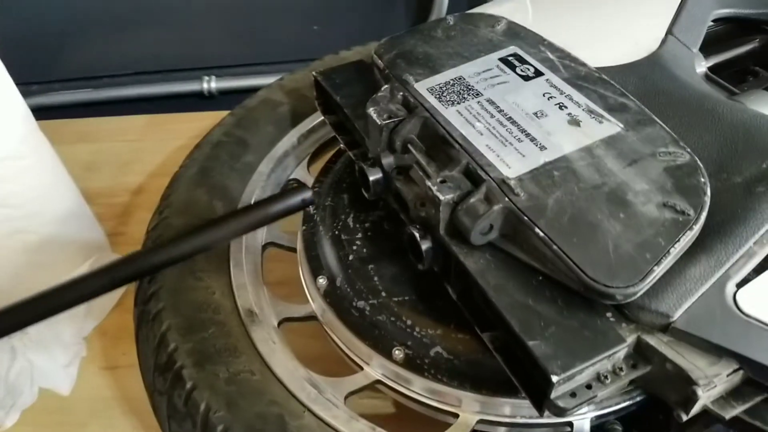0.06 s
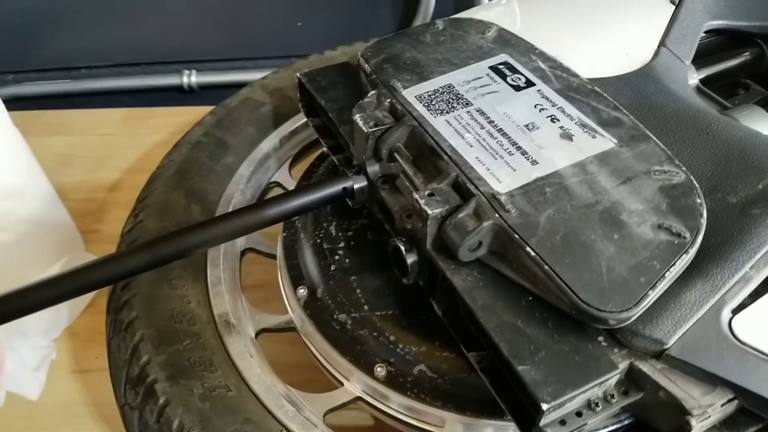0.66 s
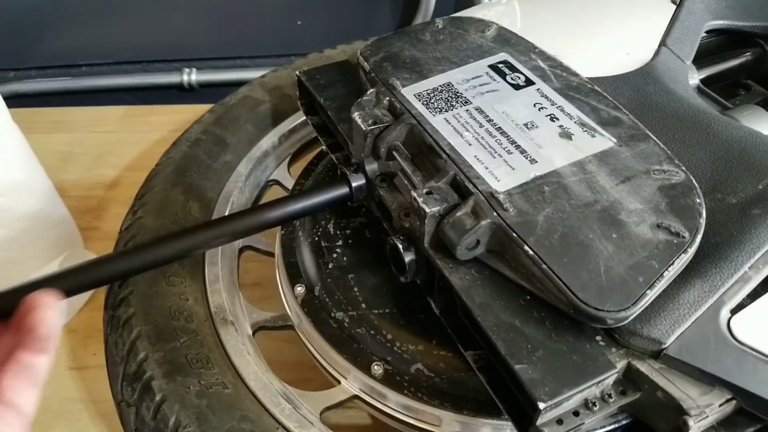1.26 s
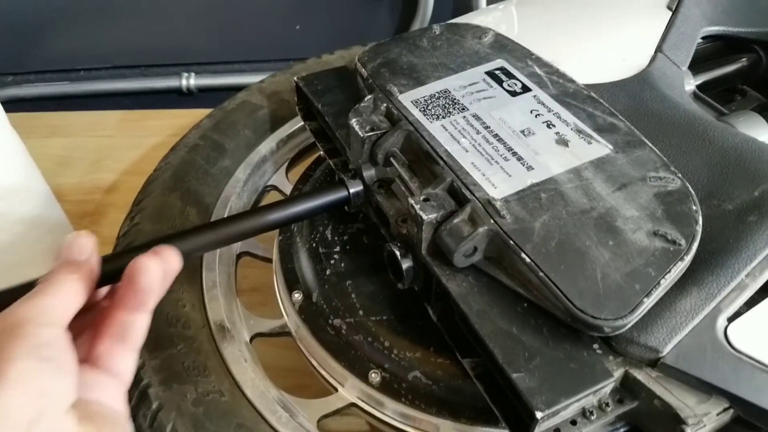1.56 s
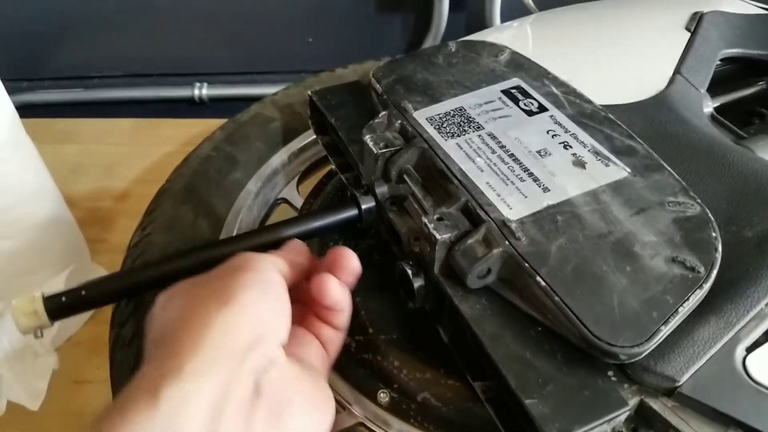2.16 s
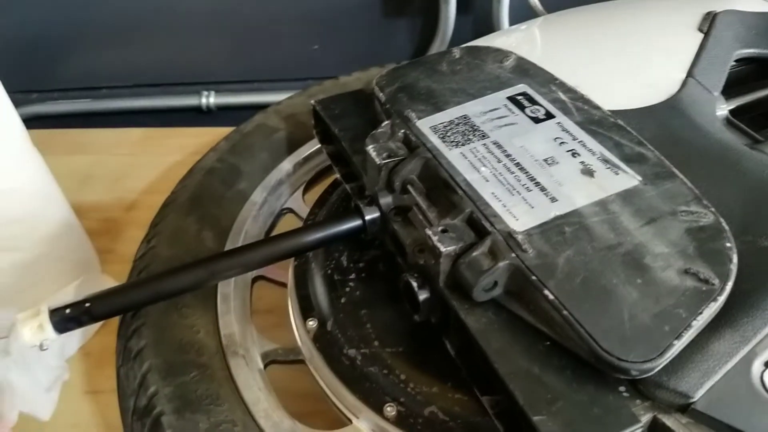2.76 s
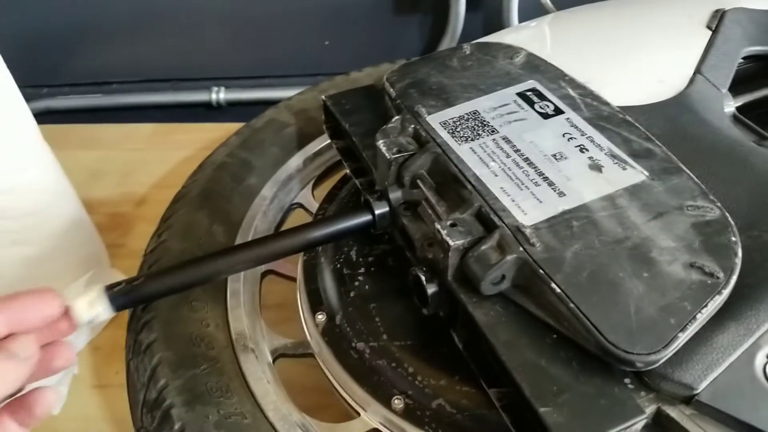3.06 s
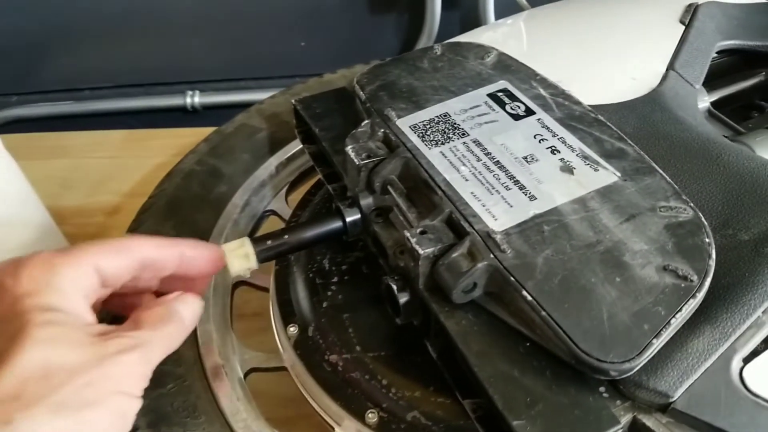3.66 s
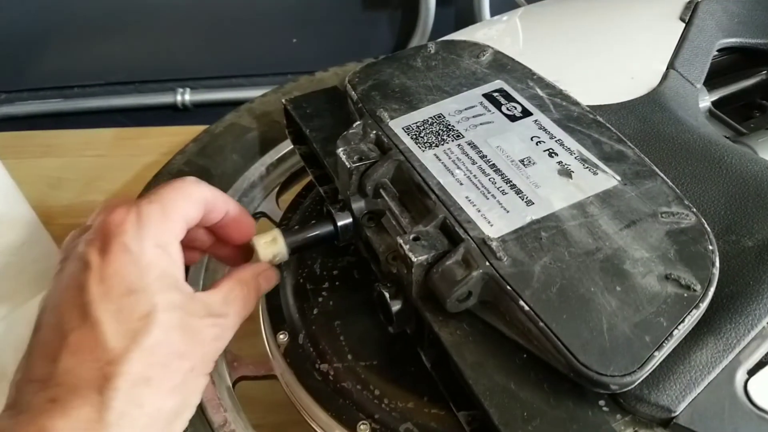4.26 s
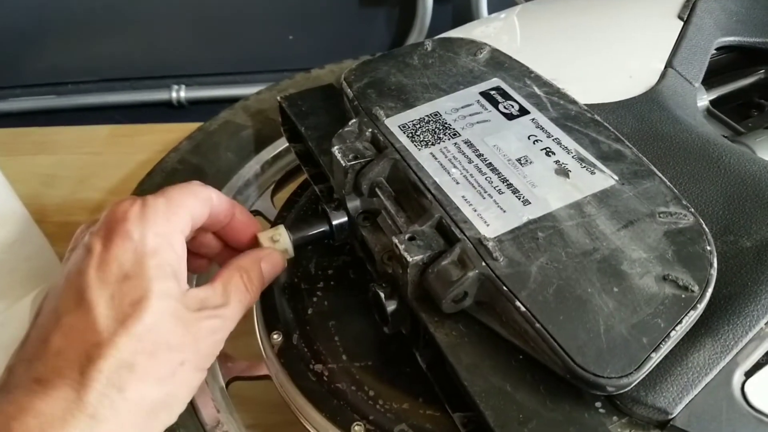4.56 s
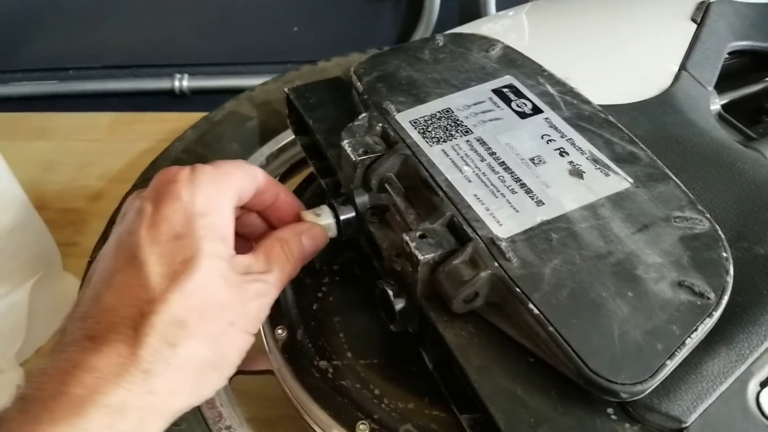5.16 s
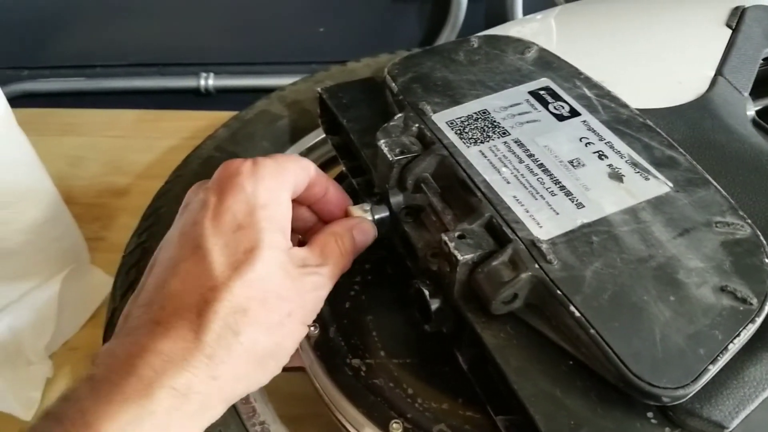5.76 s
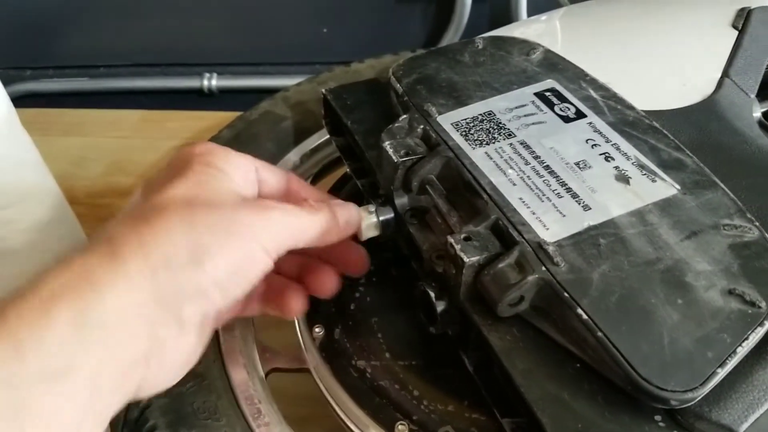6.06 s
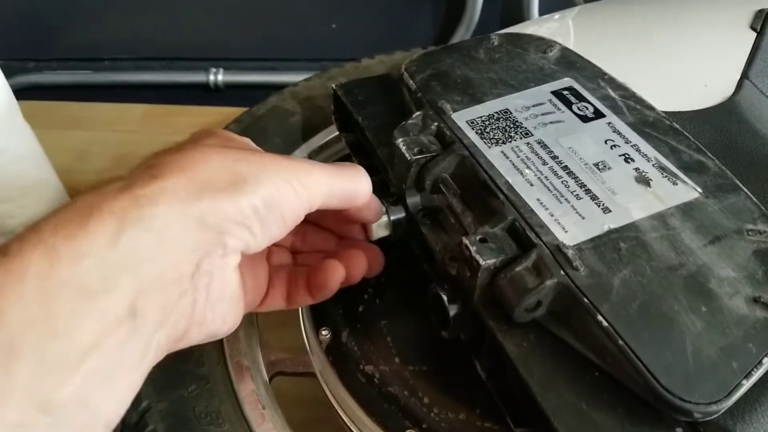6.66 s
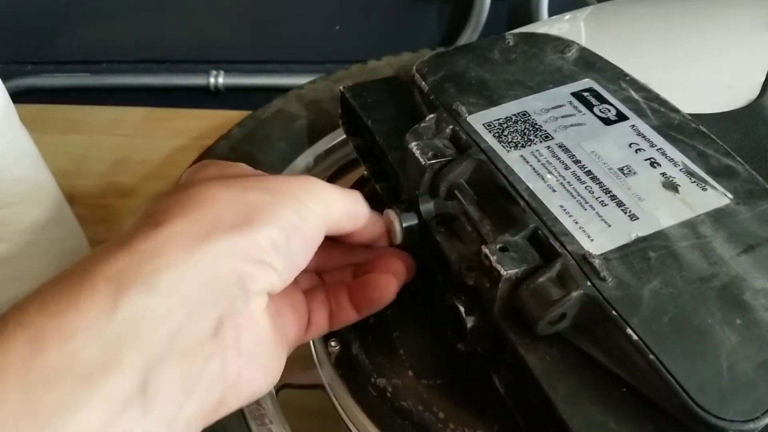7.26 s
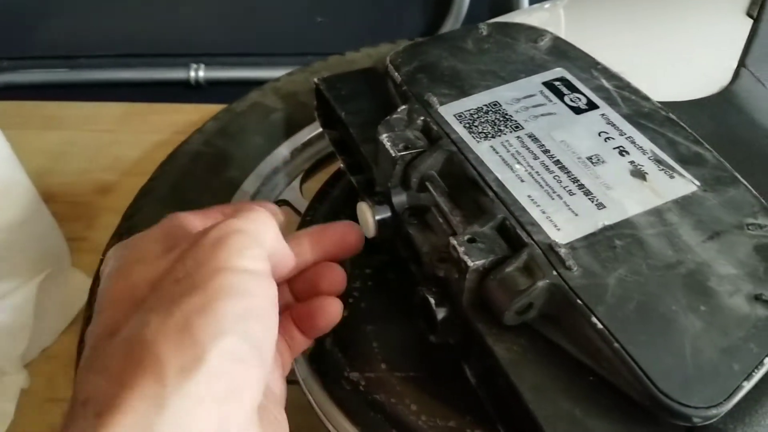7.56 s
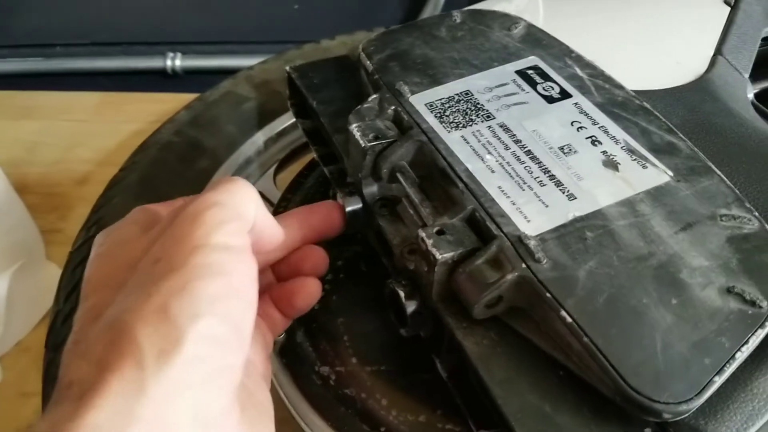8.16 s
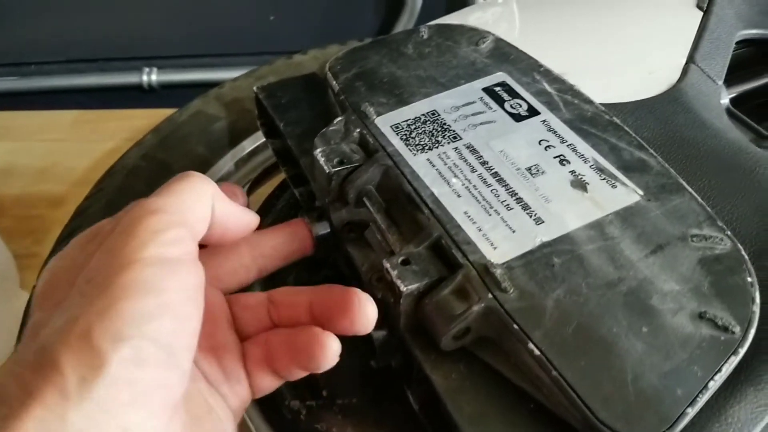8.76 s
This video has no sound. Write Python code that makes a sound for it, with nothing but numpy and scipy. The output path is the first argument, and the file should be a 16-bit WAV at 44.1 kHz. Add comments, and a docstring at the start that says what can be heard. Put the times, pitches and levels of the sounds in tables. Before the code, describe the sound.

A metal rod knocks against a wheel's metal and plastic frame, each contact ringing briefly. It is pushed in by hand with short, gritty scrapes and a rough, squeaky chatter. After a pair of sharp clacks the scraping thins out into light clicks, faint finger rubbing, a small tinkle and soft thuds on the workbench. It is all heard close up in a small, quiet room.

```python
"""A knock of metal, close by: a greased rod meets the mouth of the bore in the frame of a wheel.
Pushed by hand, it scrapes and chatters inwards in short shoves and is pressed home by the fingertips.
Every contact rings the same metal and plastic housing; the workbench thuds softly under the wheel.
A small quiet room, heard from beside the bench through a pair of small microphones."""
import sys
import numpy as np
from scipy import signal
from scipy.fft import rfft, irfft
from scipy.io import wavfile

SR = 44100
rng = np.random.default_rng(int(sys.argv[2]) if len(sys.argv) > 2 else 0)


def int16_out(signal):
    """Quantize to a 16-bit WAV file."""
    q = np.round(np.clip(np.atleast_2d(signal).T, -1, 1) * 32767)
    wavfile.write(sys.argv[1], SR, q.astype(np.int16))


N = 397341
TIME = np.arange(N) / SR
RING_TIME = np.arange(int(SR * 0.36)) / SR

# Levels are relative within each table.
# rod knocking on the frame: (time [s], level [dB], hardness as crack against clack [dB], rattle time [s])
ROD_KNOCKS = [(0.408, -37.5, -7.5, 0.0013), (0.88, -66, 16.5, 0.0077), (0.924, -28.5, 11, 0.00053),
              (0.951, -29, 0, 0.0032), (1.183, -30.5, 10.5, 0.0021), (1.412, -34, 1, 0.0073),
              (1.818, -32.5, 2.5, .0096), (1.966, -36, 16.5, .009), (2.254, -32, -10.5, 0.0052),
              (2.270, -33, -7.5, 0.01), (3.043, -44, 17.5, 0.003), (3.139, -28, 3, 0.001),
              (4.285, -20.5, -13.5, 0.0031), (4.434, -26, -4, 0.0051), (4.624, -45, -14, 0.0016),
              (4.732, -54, 8.5, 0.0021), (4.796, -48, -7.5, 0.0031), (5.483, -58, 0.5, 0.00058),
              (5.603, -47.5, -26, 0.0031), (5.725, -39.5, -7, 0.0063), (6.124, -47.5, -17.5, 0.0045),
              (7.143, -42.5, 4, .0031), (7.297, -45, -9, 0.0019), (7.945, -57.5, -1, 0.0051),
              (8.312, -63, 11.5, .0023), (8.51, -63, -5, 0.0022)]
# shoves along the bore: (start [s], length [s], level [dB], grit as hiss against scrape [dB])
ROD_SHOVES = [(1.195, 0.13, -38.5, -0.5), (1.335, 0.16, -55, 17), (1.42, 0.046, -46, 13.5),
              (1.47, 0.23, -45, 2), (1.655, 0.035, -36, 5.5), (1.72, 0.074, -38, 4.5),
              (1.795, 0.1, -30, -2), (1.92, 0.054, -45.5, 7), (1.972, 0.058, -26.5, -7),
              (2.04, 0.051, -40.5, -5.5), (2.11, 0.061, -46.5, -7.5), (2.3, 0.11, -61, -8),
              (2.41, 0.038, -49.5, -12), (2.49, 0.066, -65, -4), (2.93, .17, -32.5, -6.5),
              (3.13, 0.089, -30.5, -4.5), (3.25, 0.06, -35, 0), (3.345, 0.12, -38.5, -6.5),
              (3.49, 0.049, -39.5, -4), (3.562, 0.076, -40.5, -6), (3.795, 0.056, -50.5, -3),
              (3.88, 0.068, -44.5, -9.5), (3.995, .04, -55, -7.5), (4.118, 0.19, -46.5, -7),
              (4.398, 0.052, -38, -11), (4.52, 0.21, -55.5, -1.5), (4.785, 0.096, -53.5, -4),
              (5.005, 0.037, -64, -11), (5.175, 0.038, -56, -12.5), (5.588, .11, -62.5, -19),
              (6.785, 0.028, -67, -11), (7.135, 0.057, -61.5, -21), (7.945, 0.057, -61, -8)]
# stick-slip in the bore: (start [s], length [s], first pitch [Hz], last pitch [Hz], level [dB])
CHATTER_GLIDES = [(1.464, 0.014, 1750, 1680, -25.5), (1.502, .165, 1792, 1552, -37),
                  (1.669, 0.22, 2072, 2140, -36), (2.933, .17, 1487, 949, -38.5),
                  (4.112, 0.1, 1760, 1220, -48.5), (4.272, 0.014, 1776, 1714, -21)]
# contacts tend to boom more as the rod goes home: (time [s], boom against clack [dB])
SEATING_BOOM = [(0.4, -7), (1.32, -8.5), (1.5, -23), (1.8, -23), (2.02, -12), (3.1, -13.5), (3.85, -1.5),
                (4.3, -10), (4.95, -1), (5.2, 8), (7.2, 11), (7.32, -12), (8.5, 10.5)]
# fingers slipping off the rod's end cap: (time [s], level [dB])
CAP_SLIPS = [(7.300, -47), (7.311, -48), (7.334, -53), (7.343, -51), (7.353, -49.5)]
# fingertips rubbing the greasy cap: (start [s], length [s], level [dB])
FINGER_RUBS = [(5.103, 0.082, -61.5), (5.586, 0.084, -55), (6.755, 0.035, -61), (7.108, 0.041, -54.5),
               (7.31, 0.054, -63.5), (7.928, 0.025, -48.5), (8.069, 0.04, -64.5), (8.224, 0.15, -60.5),
               (8.434, 0.11, -64), (8.581, 0.13, -64)]
# the wheel rocking on its tyre: (time [s], level [dB])
WHEEL_ROCKS = [(0.471, -59.5), (0.936, -49), (1.194, -52.5), (1.52, -47.5), (1.858, -45), (2.026, -44.5),
               (2.476, -45.5), (3.188, -56), (4.305, -45.5), (4.43, -48), (4.511, -49.5), (5.199, -48),
               (5.549, -49), (5.68, -51.5), (6.662, -52.5), (6.946, -51), (7.149, -42.5), (7.48, -49),
               (8.931, -48)]
# soft pats of the hand: (time [s], level [dB])
HAND_PATS = [(6.953, -36), (7.486, -34), (8.513, -33), (8.92, -37)]
# main modes of the housing: (frequency [Hz], energy [dB], t60 [s])
HOUSING_RING = [(314, -8.5, 0.25), (361.2, -3, .14), (386, -9, 0.19), (753, -7, 0.067), (917, -11.5, 0.031),
                (968, 0.5, 0.049), (1049, -3, 0.079), (1202.5, -2.5, 0.045), (1260, -7, 0.1),
                (1498, -7, 0.092), (1742, 2, 0.081), (1978, 0.5, .06), (2115, -2, 0.031),
                (2380, -16.5, 0.16), (2670, -13, 0.1), (3118, -8, 0.027), (3310, -11, 0.19),
                (3730, -14.5, 0.29), (3780, -15.5, .03), (5020, -16, 0.1), (5143, -11, 0.028),
                (7050, -14.5, 0.059), (7130, -7, .05), (10780, -12.5, 0.055), (11100, -11.5, 0.018),
                (12230, -10.5, 0.03)]
# modes of the rod: (frequency [Hz], energy [dB], t60 [s])
ROD_RING = [(1762, 3.5, 0.077), (1978, 3, 0.13), (3103, -2.5, .16), (4070, -12, 0.2), (4900, -6, 0.15),
            (7042, -5.5, 0.067), (10650, -10, 0.13)]
# modes of the end cap: (frequency [Hz], energy [dB], t60 [s])
CAP_RING = [(2193, 7, 0.062), (3516, 4, 0.078), (4150, 0.5, 0.041), (5464, -5, .05), (6580, -7, 0.14)]
# the housing's crowd of small panel modes: (frequency [Hz], spectral level [dB])
PANEL_SPECTRUM = [(150, -23), (250, -22.5), (350, 0), (500, -3.5), (650, -1), (900, 3), (1400, -6),
                  (2100, 3), (2500, -7), (4000, -6), (5200, -11), (6200, -12.5), (7200, -9), (12000, -12.5),
                  (16000, -6.5)]
# skin on plastic: (frequency [Hz], spectral level [dB])
SKIN_SPECTRUM = [(150, -25.5), (360, 7), (550, -9), (1500, -8), (1800, 7), (2200, -7), (3100, -9),
                 (4000, -4), (5400, -7), (6500, 3), (7400, 4), (11000, -12.5), (16000, -1)]
# room tone and microphone hiss: (frequency [Hz], spectral level [dB])
ROOM_TONE_SPECTRUM = [(15, -12.5), (40, 2), (90, -3.5), (150, -11), (250, -18), (370, -13.5), (550, -21.5),
                      (1000, -25), (2000, -31.5), (5000, -32.5), (7000, -33), (11000, -38), (13000, -37),
                      (16000, -28)]
# stereo width at the microphone pair: (frequency [Hz], side against mid [dB])
STEREO_WIDTH = [(30, -11.5), (130, -6), (330, -12), (700, -4.5), (1500, 0), (3000, -1.5), (5000, 0),
                (16000, -0.5)]
# balance of the pair: (frequency [Hz], left against right [dB])
STEREO_BALANCE = [(60, 4.5), (130, -0.5), (330, 1.5), (800, 0), (1500, -3.5), (2200, -0.5), (6000, 1.5),
                  (7500, 1), (10500, -1), (12700, -5), (15500, 0)]
# colour of the microphone ports, with their deep null: (frequency [Hz], gain [dB])
PORT_RESPONSE = [(5800, -0.5), (6950, 3), (7500, -2.5), (8100, -18.5), (8900, -28.5), (9550, -5.5),
                 (10100, -11), (10900, 0), (12300, 6.5), (16000, -5)]


def knocks(modes, gain_db, rattle_db, rod_db, boom_db, grip_from_s, grip_damping_db):
    """A first touch and a brief rattle as the parts seat; the rod rings too, less once it is held."""
    out = np.zeros((2, N))
    t = RING_TIME[:len(RING_TIME) // 4]
    for s, db, hardness_db, rattle_s in ROD_KNOCKS:
        settling = (1 - np.exp(-t / 0.0014)) * np.exp(-t / rattle_s)
        force = from_db(rattle_db) * energy_one(rng.standard_normal(len(t)) ** 3 * settling)
        force[0] += 1  # the first touch
        # a hard contact is short and reaches the high modes
        bands = housing(modes, panel_db=0.5, panel_t60=0.025, room_db=-4.5, room_t60=0.26,
                        edge_db=-0.5 + 0.86 * hardness_db, treble_db=-3.5 + 0.4 * hardness_db)
        for band, band_db in zip(bands, (boom_db + 0.56 * seating(s), 0, hardness_db)):
            struck = energy_one(signal.fftconvolve(band, force[None], axes=1))
            add(out, s, from_db(gain_db + db + band_db) * struck)
        tilt_db_per_octave = 0.6 * hardness_db
        rod = ring([(hz, mode_db + tilt_db_per_octave * np.log2(hz / ROD_RING[0][0]), t60)
                    for hz, mode_db, t60 in ROD_RING])
        rod = energy_one(rod * (1 - np.exp(-RING_TIME / rattle_s)))
        ring_db = db + max(hardness_db, 0) + rod_db - grip_damping_db * (s > grip_from_s)
        add(out, s, from_db(gain_db + ring_db) * rod)
    return out


def scraping(modes, slips_per_s, judder_db, judder_hz, grease_db):
    """Tiny uneven slips over the smooth shear of grease, bunched by the hand's judder, drive the housing."""
    # sliding excites the rod as well, though the bore shortens its ring
    rubbed_rod = ring([(hz, db, 0.029) for hz, db, _ in ROD_RING])
    sliding_modes = energy_one(modes + from_db(-6.5) * rubbed_rod)
    sizes = from_db(3.5 * np.minimum(rng.exponential(1, N), 4)) * rng.choice([-1, 1], N)
    slips = rms_one(sizes * (rng.random(N) < slips_per_s / SR))
    shear = from_db(grease_db) * rng.standard_normal(N)
    friction = rms_one((slips + shear) * from_db(judder_db * drift(judder_hz)))
    out = np.zeros((2, N))
    for s, length, db, grit_db in ROD_SHOVES:
        during, pressure = push(s, length, attack_s=0.024, slope_db_per_s=-2.5, release_db_per_s=357.5)
        # each shove touches a new spot, so the housing answers anew; a gritty shove is brighter
        bands = housing(sliding_modes, panel_db=-3, panel_t60=0.029, room_db=-9.5, room_t60=0.25,
                        edge_db=-4.5 + 0.14 * grit_db, treble_db=4.5 + 0.28 * grit_db)
        for band, band_db in zip(bands, (seating(TIME[during]) + 0.5, 1.5, grit_db + 3.5)):
            force = friction[during] * pressure * from_db(db + band_db)
            add(out, s, signal.fftconvolve(band, force[None], axes=1))
    return out


def housing(modes, panel_db, panel_t60, room_db, room_t60, edge_db, treble_db):
    """Main modes, small panel modes and the room answer one contact, split into boom, clack and crack."""
    t = RING_TIME
    panels = energy_one(stereo_noise(PANEL_SPECTRUM, len(t)) * from_db(-60 * t / panel_t60))
    swell = 1 - np.exp(-t / 0.0045)
    room = energy_one(stereo_noise(PANEL_SPECTRUM, len(t)) * swell * from_db(-60 * t / room_t60))
    whole = cut(modes + from_db(panel_db) * panels + from_db(room_db) * room, 250, "high", order=4)
    # a sharp edge excites the upper modes more than a blunt face does
    contact = [(700, 0.0027), (2200, edge_db), (4000, edge_db), (12000, edge_db + treble_db)]
    whole = np.array([colour(side, contact, size=1024) for side in whole])
    boom_below_hz, crack_above_hz = 600, 2400
    boom = cut(whole, boom_below_hz, "low", order=8)
    clack = cut(whole, [boom_below_hz, crack_above_hz], "band", order=4)
    crack = cut(whole, crack_above_hz, "high", order=6)
    return [energy_one(band) for band in (boom, clack, crack)]


def seating(s):
    """How much the rod's seat favours the boom at time s, in dB."""
    return np.interp(s, *np.transpose(SEATING_BOOM))


def chatter(gain_db, wobble_hz):
    """The rod grabs and slips almost regularly: a rough tone that glides as it goes deeper."""
    out = np.zeros((2, N))
    wobble = (drift(wobble_hz) + 1j * drift(wobble_hz)) * from_db(gain_db)
    microphone_phase = np.array([[0], [1.1]])
    for s, length, first_hz, last_hz, db in CHATTER_GLIDES:
        during, pressure = push(s, length, attack_s=0.017, slope_db_per_s=0, release_db_per_s=698)
        hz = np.interp(TIME[during], [s, s + length], [first_hz, last_hz])
        phase = 2 * np.pi * np.cumsum(hz) / SR + microphone_phase
        add(out, s, from_db(db) * pressure * np.real(wobble[during] * np.exp(1j * phase)))
    return out


def end_cap(gain_db):
    """The cap tinkles as the fingers slip off it."""
    out = np.zeros((2, N))
    for s, db in CAP_SLIPS:
        add(out, s, from_db(db + gain_db) * ring(CAP_RING))
    return out


def fingertips(gain_db, grain_db, grain_hz):
    """Skin ridges catch and slip: a fine, grainy hiss that grows with pressure until the skin lets go."""
    envelope = np.zeros(N)
    for s, length, db in FINGER_RUBS:
        _, pressure = push(s, length, attack_s=0.036, slope_db_per_s=72, release_db_per_s=274)
        add(envelope, s, from_db(db) * pressure)
    hiss = rms_one(stereo_noise(SKIN_SPECTRUM, N) * from_db(grain_db * drift(grain_hz)))
    return from_db(gain_db) * envelope * hiss


def bench(bounce_db, bounce_hz, bounce_t60, rumble_db, pat_db, pat_hz, pat_t60):
    """Soft pushes and pats make the wheel thud and rumble on the wooden top."""
    rumble_spectrum = [(25, -18.5), (60, -4), (90, 6.5), (125, -13), (180, -11), (300, -30.5),
                       (900, -75.5)]
    rumble = stereo_noise(rumble_spectrum, N)
    out, rocking, t = np.zeros((2, N)), np.zeros(N), RING_TIME
    for s, db in WHEEL_ROCKS:
        fading = from_db(db - 60 * t / bounce_t60) * (1 - np.exp(-t / 0.006))
        add(rocking, s, fading)
        add(out, s, from_db(bounce_db) * fading * np.sin(2 * np.pi * bounce_hz * t))
    for s, db in HAND_PATS:
        fading = from_db(db + pat_db - 60 * t / pat_t60) * (1 - np.exp(-t / 0.0026))
        add(out, s, fading * np.sin(2 * np.pi * pat_hz * t))
    return out + from_db(rumble_db) * rocking * rumble


def room_tone(gain_db):
    """The still air of the workshop and the microphones' own hiss."""
    return from_db(gain_db) * stereo_noise(ROOM_TONE_SPECTRUM, N)


def push(start, length, attack_s, slope_db_per_s, release_db_per_s):
    """Sample indices and envelope of one push: attack, a sloping hold, release."""
    during = np.flatnonzero((TIME >= start) & (TIME < start + length + RING_TIME[-1]))
    t = TIME[during] - start
    hold_db = slope_db_per_s * (np.minimum(t, length) - length / 2)
    release_db = release_db_per_s * np.maximum(t - length, 0)
    return during, np.minimum(t / attack_s, 1) * from_db(hold_db - release_db)


def ring(modes):
    """Decaying sines; higher modes reach the two microphones further out of phase."""
    out = 0
    for k, (hz, db, t60) in enumerate(modes):
        side_gain = from_db(np.interp(hz, *np.transpose(STEREO_WIDTH)))
        apart = np.arctan(side_gain) * (-1) ** k
        phase = rng.uniform(0, 2 * np.pi) + apart * np.array([[1], [-1]])
        wave = np.sin(2 * np.pi * hz * RING_TIME + phase) * from_db(-60 * RING_TIME / t60)
        out = out + from_db(db) * energy_one(wave)
    return energy_one(out)


def stereo_noise(spectrum, size):
    """Coloured noise, alike at both microphones in the bass and unrelated in the treble."""
    mid, side = (colour(white, spectrum)[-size:] for white in rng.standard_normal((2, size + 4096)))
    side = colour(side, STEREO_WIDTH)
    return rms_one(np.array([mid + side, mid - side]))


def drift(rate_hz):
    """Random wander below rate_hz, at unit power."""
    return rms_one(cut(rng.standard_normal(N + SR), rate_hz, "low")[SR:])


def colour(x, points, power=1, size=4096):
    """Causal (minimum-phase) filter through points of (frequency [Hz], gain [dB])."""
    hz, db = np.transpose(points)
    bin_hz = np.arange(size // 2 + 1) * SR / size
    gain = from_db(power * np.interp(np.log(bin_hz + 1), np.log(hz), db))
    cepstrum = irfft(np.log(gain))[:size // 2]
    cepstrum[1:] *= 2
    response = irfft(np.exp(rfft(cepstrum, size)))
    return signal.oaconvolve(x, response)[:len(x)]


def cut(x, hz, kind, order=2):
    """Butterworth filter."""
    return signal.sosfilt(signal.butter(order, hz, kind, fs=SR, output="sos"), x)


def add(out, s, sound):
    """Mix a short sound in at time s."""
    start = int(s * SR)
    out[..., start:start + sound.shape[-1]] += sound[..., :N - start]


def from_db(db):
    """Decibels to gain."""
    return 10 ** (np.asarray(db) / 20)


def rms_one(x):
    """Scale to unit power."""
    return x / np.sqrt(np.mean(x ** 2) + 1e-20)


def energy_one(x):
    """Scale to unit energy, averaged over the channels."""
    return rms_one(x) / np.sqrt(x.shape[-1])


def scene():
    """Rod and fingers up close, the bench underneath, the quiet workshop behind."""
    modes = ring(HOUSING_RING)
    mix = scraping(modes, slips_per_s=3000, judder_db=2.5, judder_hz=50.4, grease_db=-6.5)
    mix += knocks(modes, gain_db=27, rattle_db=7, rod_db=-7.5, boom_db=-4.5,
                  grip_from_s=2.9, grip_damping_db=13)
    mix += chatter(gain_db=1, wobble_hz=130)
    mix += end_cap(gain_db=26)
    mix += fingertips(gain_db=3, grain_db=1, grain_hz=199)
    mix += bench(bounce_db=2, bounce_hz=94.7, bounce_t60=0.44, rumble_db=0.5,
                 pat_db=-2.5, pat_hz=142, pat_t60=0.039)
    return mix + room_tone(gain_db=-59.5)


def record(dry):
    """Two small microphone ports, each with its own colour; the top is cut steeply at 15.9 kHz."""
    heard = [colour(colour(side, PORT_RESPONSE), STEREO_BALANCE, power=lean)
             for side, lean in zip(dry, (0.5, -0.5))]
    top_cut = signal.ellip(12, 0.1, 80, 15900, fs=SR, output="sos")
    return signal.sosfilt(top_cut, heard)


dry = scene()
out = record(dry)
int16_out(out)
```